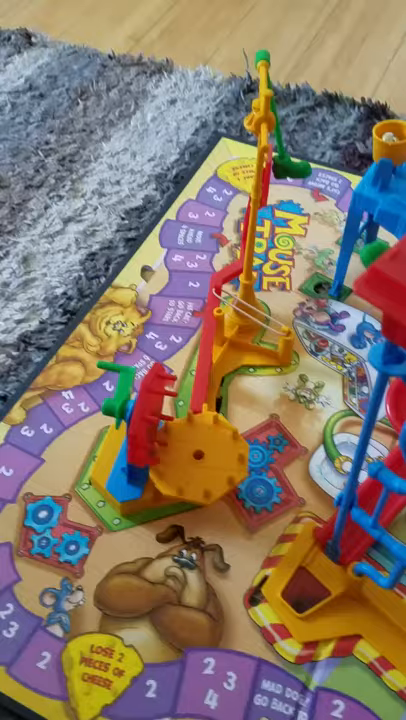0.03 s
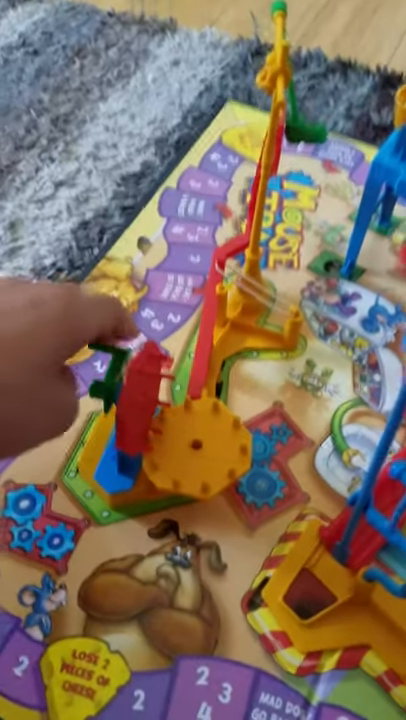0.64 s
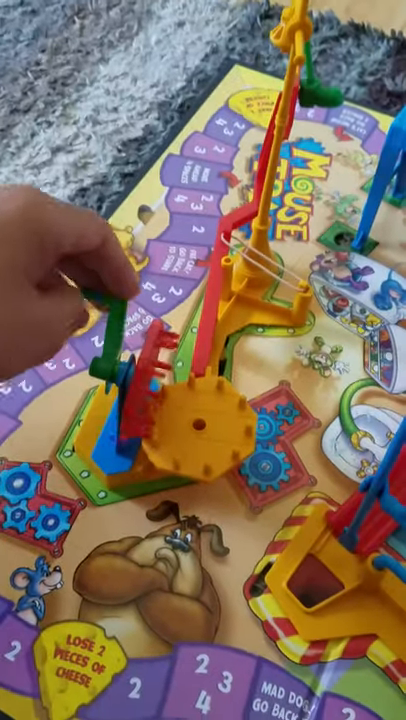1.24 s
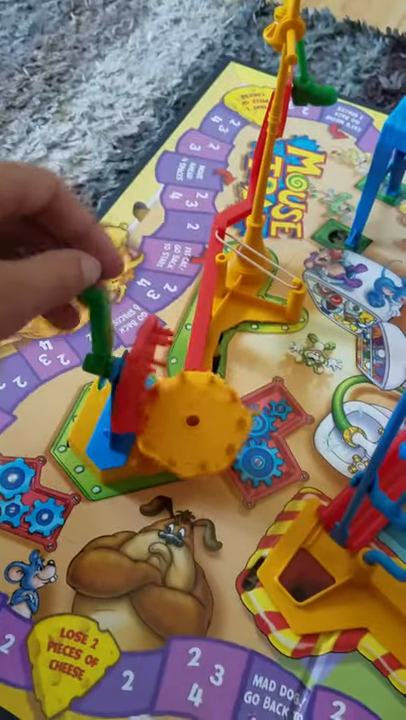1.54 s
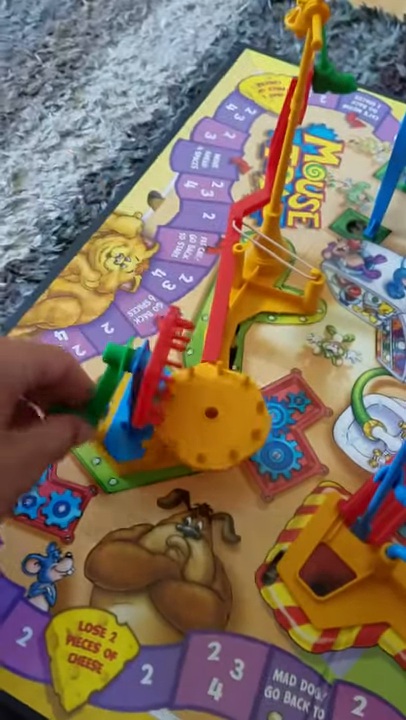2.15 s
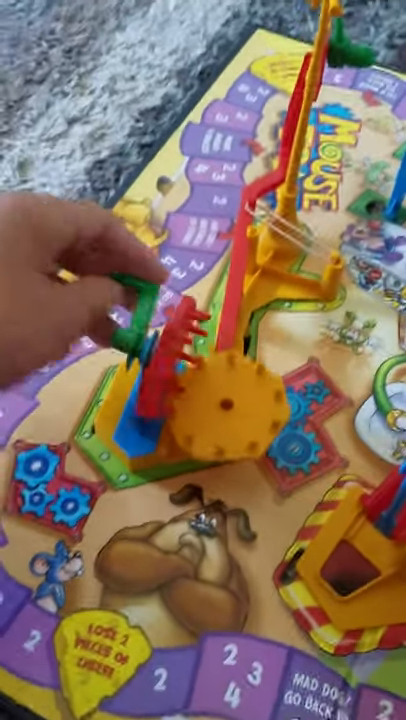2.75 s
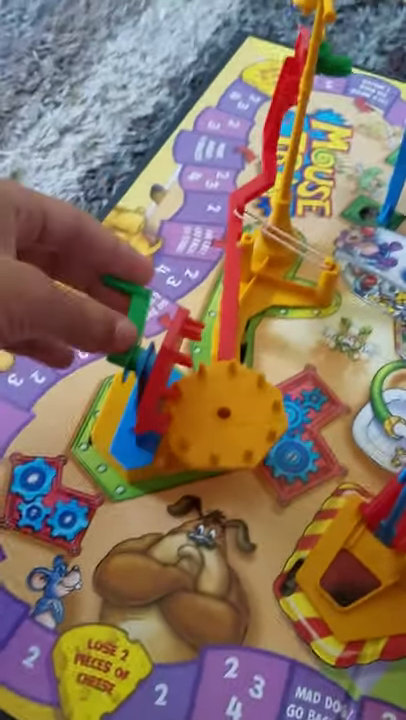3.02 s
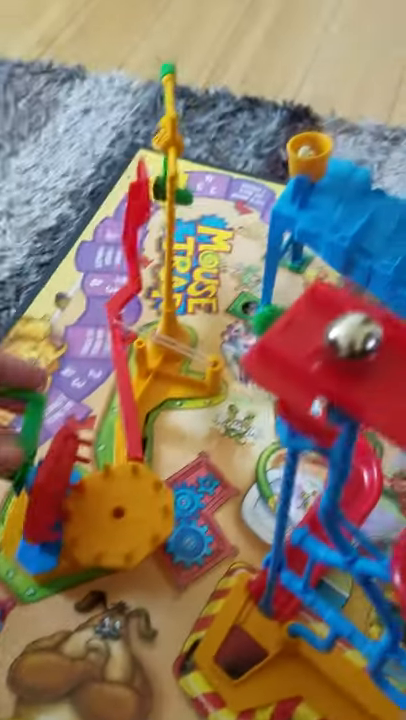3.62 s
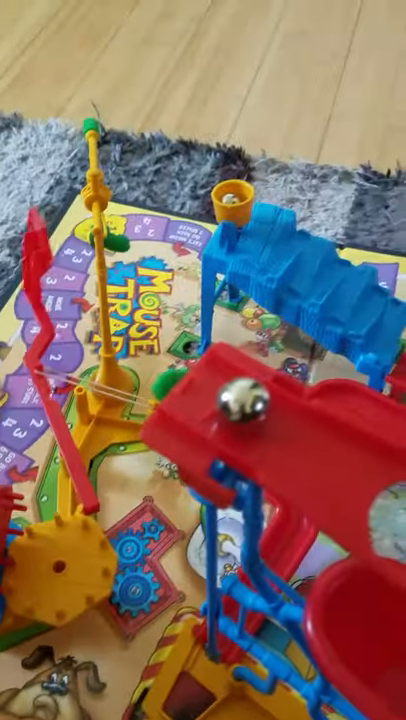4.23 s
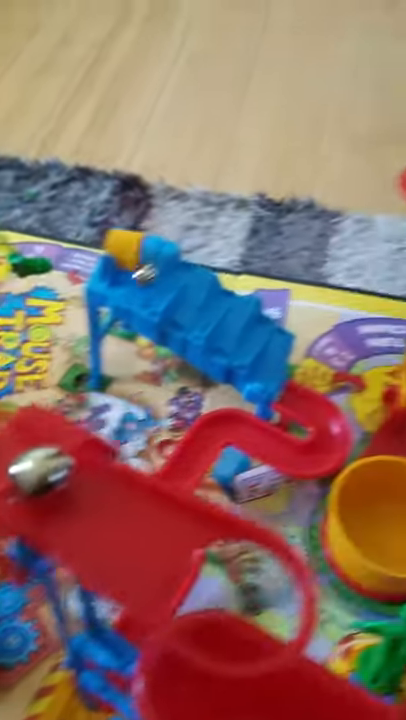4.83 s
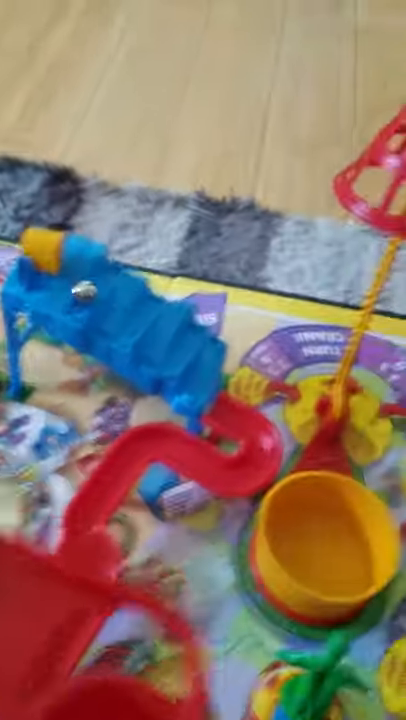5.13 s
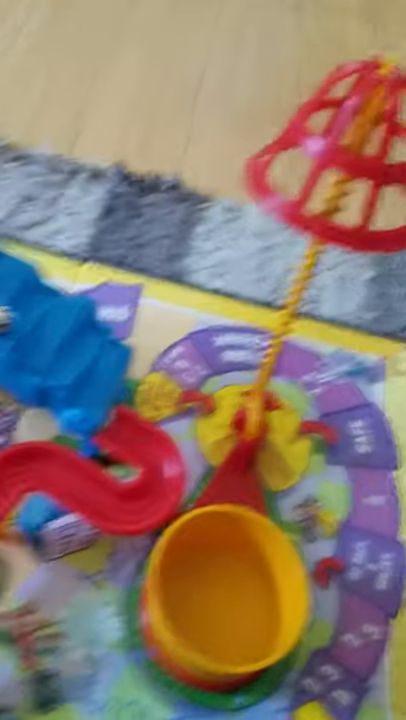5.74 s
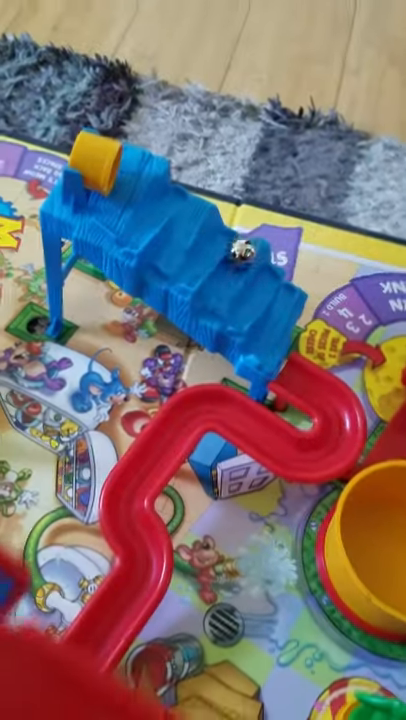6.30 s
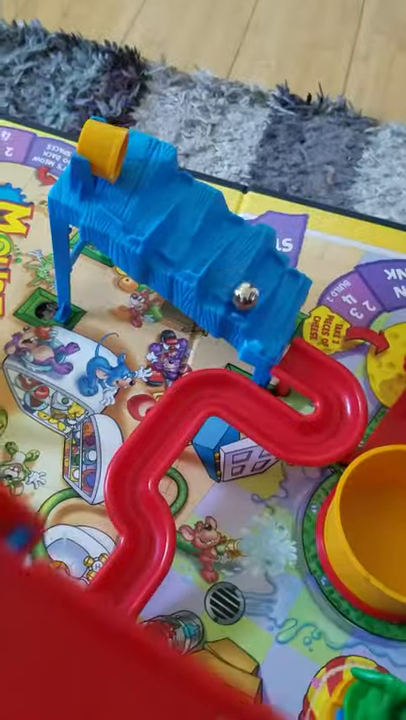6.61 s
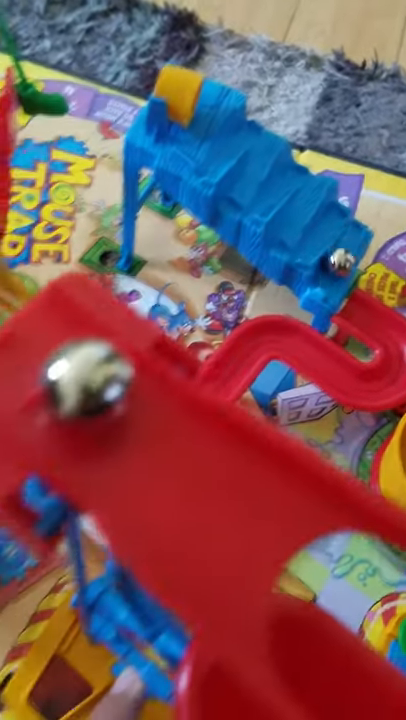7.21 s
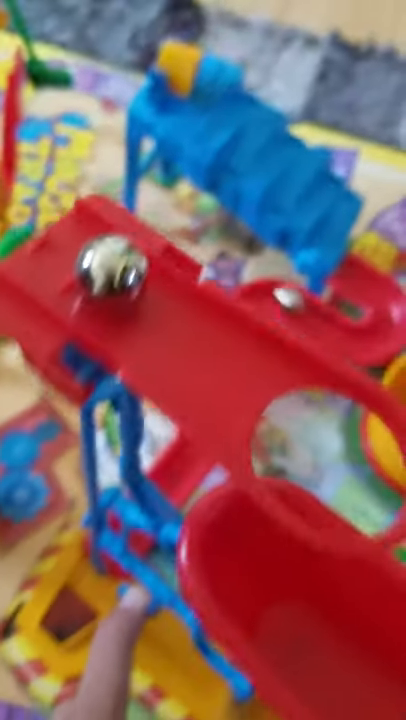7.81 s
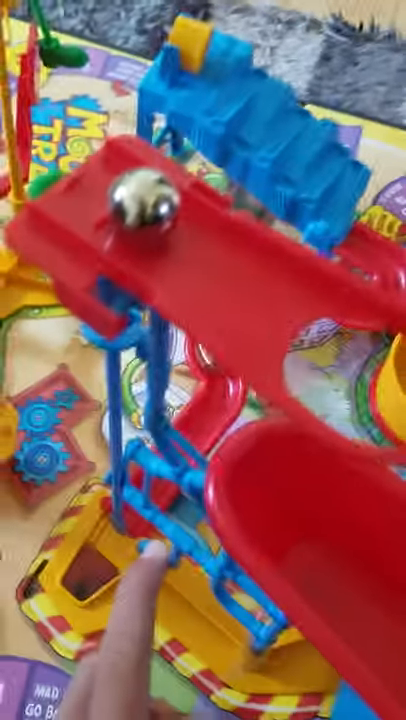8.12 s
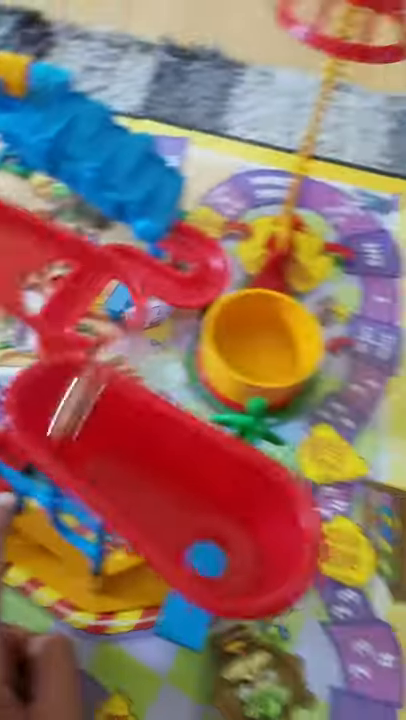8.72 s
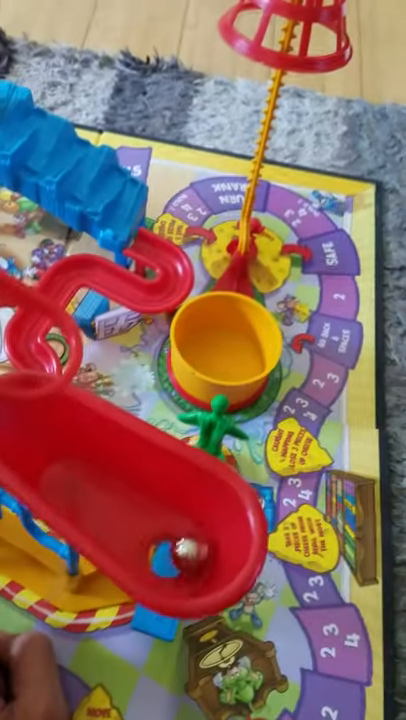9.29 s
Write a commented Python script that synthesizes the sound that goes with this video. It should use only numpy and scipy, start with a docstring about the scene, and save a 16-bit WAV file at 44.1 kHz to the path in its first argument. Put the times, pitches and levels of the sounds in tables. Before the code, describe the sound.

Small plastic gears click and grind softly as a toy crank turns, followed by a few faint ticks. A lever snaps with a sharp rattle, and a steel ball knocks unevenly down hollow plastic steps, then rumbles along a chute. A plank clatters and a second ball drops into a plastic tub with the loudest clacks, bouncing and settling. It is all heard close by in a quiet living room.

```python
"""Plastic gears grind and click over faint room air: a crank starts a chain-reaction toy on a game board. The
crank ticks at a steady pace and a stretched lever snaps; a steel ball tumbles down steps, rolls along a chute
and knocks a rod, which drops a second ball off a plank into a tub. Blows and tiny rolling bumps ring each
plastic part's resonances. Heard close by in a living room."""
import sys
import numpy as np
from scipy import signal
from scipy.fft import rfft, irfft
from scipy.io import wavfile
from scipy.ndimage import uniform_filter1d

SR = 44100
rng = np.random.default_rng(int(sys.argv[2]) if len(sys.argv) > 2 else 0)


def int16_out(signal):
    """Quantize to a 16-bit WAV file."""
    q = np.round(np.clip(np.atleast_2d(signal).T, -1, 1) * 32767)
    wavfile.write(sys.argv[1], SR, q.astype(np.int16))


N = 412335
TIME_S = np.arange(N) / SR

# Blows: (time [s], clack level [dB], tick re clack [dB], spot ring [Hz], first hop [s])
TUB_HITS = [(8.7985, -18.5, -11, 1480, 0.00014), (8.826, -15, -9.5, 1750, 0.016),
            (8.922, -26.5, -9.5, 1450, 0), (8.951, -19.5, -9, 1800, 0.021), (9.016, -20, -12, 1590, .019),
            (9.124, -43.5, -33, 1500, 0.014), (9.166, -43.5, -21.5, 1460, 0),
            (9.199, -48, -8, 1940, 0.0022), (9.317, -58, -12, 1480, 0)]
STEP_HITS = [(4.916, -32, -10, 1980, 0.029), (4.999, -29, -9.5, 1600, 0.048), (5.146, -45.5, -1, 1300, 0),
             (5.217, -39, -19, 1340, 0.025), (5.354, -49.5, -22, 1700, 0.00053),
             (5.389, -38.5, -19, 1270, 0.0014), (5.407, -30, -20, 1650, 0.026),
             (5.471, -27, -18.5, 1500, 0.026), (5.721, -25, -20, 1500, 0.045), (5.788, -24, -14, 2100, 0),
             (5.833, -29.5, -26, 1490, .017), (6.04, -41.5, -23, 1260, 0.02),
             (6.151, -27, -16.5, 1400, 0.022), (6.219, -27, -16.5, 2500, .043), (6.232, -32, -17, 2430, 0),
             (6.524, -27.5, -16.5, 1100, 0.037), (6.649, -29, -8.5, 1670, 0),
             (6.854, -38, -17.5, 2100, .031), (6.982, -33.5, -18.5, 2100, 0.012),
             (7.039, -33, -10, 2150, 0), (7.065, -34, -21, 2100, 0), (7.096, -34.5, -19, 2280, 0)]
LEVER_HITS = [(4.416, -37.5, -7, 2450, 0), (4.424, -33.5, -12, 2770, 0.0098),
              (4.446, -31, -9, 2520, 0.0018), (4.458, -30.5, 5, 8300, 0), (4.466, -31.5, -1, 2610, 0),
              (4.494, -34.5, -28, 2580, 0.00031), (4.514, -35, 10, 12800, 0.031),
              (4.606, -37, -12, 2430, 0), (4.639, -22, -8.5, 3600, 0.00048), (4.698, -29, -9, 3450, 0),
              (4.716, -30, -16, 1220, 0), (4.776, -35, -4, 3240, .013)]
PLANK_HITS = [(8.417, -37, 7, 2130, 0.001), (8.437, -31, -4.5, 2010, 0.011),
              (8.494, -28.5, 0, 1740, 0.0063), (8.525, -30, -5, 1860, 0.031),
              (8.576, -32.5, -13.5, 1020, 0), (8.64, -42, -14, 1000, 0.0043), (8.675, -48, -4, 1470, 0),
              (8.715, -47.5, 8.5, 2220, 0.044)]
CHUTE_HITS = [(7.296, -33.5, -9.5, 2050, .022), (7.382, -32, 1, 14000, 0), (7.404, -31, -1, 5160, 0),
              (7.51, -48, -9, 2770, 0.0022), (7.582, -40.5, -18, 2680, 0), (7.73, -47, -22, 2100, 0),
              (7.883, -44.5, -11, 1490, 0.0023), (8.194, -38.5, -11.5, 1700, 0.016)]
GEAR_HITS = [(0.639, -54.5, -1.5, 2620, 0), (1.303, -61, -6, 1000, 0.0006), (1.391, -56, -8, 1000, 0),
             (1.486, -56.5, -28, 1610, 0.0016), (1.67, -46, -19, 2200, 0.0013),
             (1.686, -41.5, -4.5, 2850, 0), (1.812, -53.5, -4, 1590, 0.00095),
             (1.956, -41.5, -3.5, 1520, 0), (2.157, -44, 0, 12530, .046), (2.393, -50.5, -8, 2200, 0.046),
             (2.724, -47, -3, 2200, 0), (2.762, -49, -0.5, 2040, 0.0039)]
CRANK_TICK_HITS = [(3.03, -51.5, -4.5, 1620, 0.00098), (3.175, -47.5, 2, 2580, 0.0039),
                   (3.273, -59, -22, 1560, 0.00047), (3.386, -53, -1.5, 2600, 0), (3.562, -63.5, -28, 1500, 0),
                   (3.664, -59.5, -28, 1340, 0.042), (3.849, -56.5, -28, 1770, .026),
                   (4.002, -62.5, -17, 1320, 0.0023), (4.155, -53.5, -17.5, 1370, 0),
                   (4.283, -62, -19, 1700, 0)]
# Broad colour of each part: (frequency [Hz], gain [dB])
TUB_COLOUR = [(60, -35), (200, -15), (330, -6.5), (550, 3.5), (900, -3), (1600, -8), (2600, -15),
              (4500, -15), (8000, -28.5), (12000, -18), (15500, -23)]
STEP_COLOUR = [(60, -38), (200, -26), (320, -16), (450, -4), (640, -2), (830, -20.5), (1600, -16),
               (2600, -22.5), (4500, -29), (8000, -32), (15500, -33.5)]
LEVER_COLOUR = [(60, -36), (200, -24), (330, -14.5), (550, -2), (900, -16), (1600, -17.5), (2600, -17.5),
                (4500, -19.5), (8000, -18), (12000, -18.5), (15500, -24)]
PLANK_COLOUR = [(60, -37), (200, -5), (330, 5), (550, 1.5), (900, -6), (1600, -10), (2600, -13),
                (4500, -20.5), (8000, -28), (12000, -27), (15500, -30)]
CHUTE_COLOUR = [(60, -45), (200, -22.5), (330, -8.5), (550, -3), (900, -7.5), (1600, -11), (2600, -13.5),
                (4500, -21.5), (8000, -33), (12000, -24), (15500, -23.5)]
GEAR_COLOUR = [(60, -20.5), (200, -13.5), (380, -5), (600, -1.5), (1100, -7), (2400, -4.5), (4500, -22),
               (8000, -25.5), (12000, -27.5), (15500, -30.5)]
CRANK_TICK_COLOUR = [(60, -35), (200, -17), (350, -4.5), (550, -10), (900, -10.5), (1600, 0.5), (2600, -5.5),
                     (4500, -15.5), (8000, -18), (15500, -26)]
# Resonances: (frequency [Hz], width [Hz], peak re colour [dB])
TUB_MODES = [(403, 76, 9.7), (1227, 27, 7.9), (1455, 50, 10), (1866, 170, 8.6), (2300, 230, 12.5),
             (2640, 17, 7.4), (2850, 15, 11), (4330, 37, 8.9), (5330, 200, 4.3), (5900, 61, 13),
             (6500, 247, 9.7), (7640, 700, 11.7), (10400, 73, 13), (10780, 160, 7.9)]
STEP_MODES = [(535, 39, 7), (935, 78, 10.2), (1057, 160, 6.3), (1236, 32, 7.8), (1410, 6.4, 1.6),
              (2086, 56, 3.1), (2429, 35, 13), (3010, 155, 9.1), (3680, 21, 6), (4020, 52, 7.9),
              (5750, 110, 2.6), (6200, 43, 7.2), (6670, 34, 2.3), (8200, 31, 5.7)]
LEVER_MODES = [(1242, 5.8, 15.3), (2380, 17, 5.7), (2537, 23, 14.4), (3760, 300, 4.6), (4140, 82, 6.8),
               (6150, 43, 8.5), (7350, 57, 6.9), (8150, 70, 8.1), (13000, 1200, 4)]
PLANK_MODES = [(720, 38, 1.4), (1467, 44, 14.7), (1885, 100, 11), (2230, 150, 10.4), (2610, 19, 6.9),
               (3585, 15, 13), (4190, 66, 12.4), (5530, 370, 4.8), (7130, 230, 5.9)]
CHUTE_MODES = [(437, 38, 7.4), (546, 50, 2.4), (660, 140, 2.5), (2070, 12, 3.1), (2325, 22, 7.7),
               (4070, 18, 2.2), (5260, 91, 6.8), (6960, 910, 9.8)]
GEAR_MODES = [(410, 150, 5), (699.7, 60, 10), (1520, 68, 6), (1610, 77, 6.5), (2260, 120, 4.5),
              (3960, 510, 6), (12500, 1300, 7)]
CRANK_TICK_MODES = [(680, 56, 15.6), (975, 91, 5), (2610, 35, 13.4), (4070, 64, 13), (6170, 80, 12),
                    (8230, 140, 12)]
# Rolling and rubbing, before band gains: (time [s], rumble [dB], rattle [dB])
TUB_ROLL = [(8.85, -25, -18), (8.9, -38, -63), (9.1, -60, -50), (9.18, -49, -48.5), (9.27, -69, -73),
            (9.35, -57, -60)]
PLANK_ROLL = [(8.41, -37, -40), (8.47, -31.5, -30.5), (8.61, -52, -55), (8.69, -52, -49.5),
              (8.81, -33.5, -28.5)]
CHUTE_ROLL = [(7.3, -44.5, -33), (7.55, -43.5, -48), (7.7, -36, -39), (7.83, -51.5, -57),
              (8.05, -48.5, -51), (8.15, -44, -35), (8.34, -37, -37.5), (8.43, -39, -42)]
GEAR_GRIND = [(1.25, -73, -70), (1.38, -58.5, -63), (1.72, -53.5, -47), (1.92, -50, -54), (2.06, -69, -74),
              (2.19, -51.5, -57.5), (2.35, -60, -63), (2.78, -53.5, -54.5), (2.88, -64, -82)]
# Runs along the treads, before band gains: (start [s], end [s], end level [dB])
STEP_RUNS = [(4.83, 5.0, -32.5), (5.22, 5.5, -38), (5.56, 5.85, -33.5), (5.98, 6.1, -35),
             (6.33, 6.52, -37.5), (6.91, 7.08, -42), (7.15, 7.29, -43)]
# Background noise spectra: (frequency [Hz], gain [dB])
AIR_COLOUR = [(15, -21), (25, -5), (49, -20.5), (107, -4.5), (174, -25), (241, -29), (291, -10.5),
              (449, -8.5), (557, -15.5), (749, -14), (1040, -19.5), (1360, -19), (8490, -37),
              (15800, -25.5)]
RUMBLE_COLOUR = [(25, -38), (55, -16), (75, -6), (92, -25), (107, 1.5), (135, -11.5), (170, -14.5),
                 (235, -10), (330, -35), (900, -74)]
# Rumble swells: (centre [s], half width [s], level [dB])
RUMBLE_SWELLS = [(.35, 0.28, -60.5), (2.3, 0.32, -64), (8.2, 0.55, -56)]
# Hum tones: (frequency [Hz], level [dB])
HUM_TONES = [(75.4, -79), (104, -71), (242.2, -73)]
# Room decay: (frequency [Hz], T60 [s])
ROOM_T60 = [(150, 0.58), (500, 0.16), (1500, 0.24), (4000, 0.26), (9000, 0.26), (15000, 0.22)]
# Stereo width: (frequency [Hz], side re mid [dB])
STEREO_WIDTH = [(100, -14.5), (500, -12), (1000, -4.5), (2000, 0), (4000, 0.5), (15000, 0.5)]


def tub():
    """The second ball falls into the tub, bounces and settles."""
    shell = body(TUB_COLOUR, TUB_MODES)
    knocks = blows(rebounds(TUB_HITS, loss_db=10.5, dulling_db=1), shell,
                   chatter_db=11.5, chatter_s=.003, linger_db=-14, side_db=-3, kick=.85,
                   ring_db=6, thud_db=-8, softening=.23, pan_db=1.5)
    rolling = roll(TUB_ROLL, shell, bumps_per_s=510, uneven_db=-1,
                   rumble_db=-3, rattle_db=-3, fizz_db=-21, pan_db=-2.5)
    return room(knocks + rolling, wet_db=-6)


def steps():
    """The ball zigzags down hollow steps, bouncing at every turn."""
    stairs = body(STEP_COLOUR, STEP_MODES)
    knocks = blows(rebounds(STEP_HITS, loss_db=6.5, dulling_db=2), stairs,
                   chatter_db=7.5, chatter_s=.003, linger_db=-14, side_db=-3.5, kick=.71,
                   ring_db=6.5, thud_db=-1.5, softening=.25, pan_db=1.4)
    rolling = roll(tread_runs(STEP_RUNS), stairs, bumps_per_s=650, uneven_db=4.5,
                   rumble_db=-4.5, rattle_db=-14, fizz_db=-39, pan_db=1)
    left, right = knocks + rolling
    return room(np.array([left, np.roll(right, 3)]), wet_db=-6)  # arrives from the left


def tread_runs(runs, growth_db=7.5, fade_db_per_s=161):
    """Roll curve: the ball gathers speed on each tread until the corner stops it."""
    t = np.arange(runs[0][0], runs[-1][1] + .1, .005)
    each_db = [db - np.interp(t, [start, end], [growth_db, 0])
               - fade_db_per_s * abs(t - np.clip(t, start, end)) for start, end, db in runs]
    level_db = np.max(each_db, axis=0)
    return np.transpose([t, level_db, level_db])


def lever():
    """The lever snaps free and kicks over the bucket holding the ball."""
    arm = body(LEVER_COLOUR, LEVER_MODES)
    knocks = blows(rebounds(LEVER_HITS, loss_db=3, dulling_db=9.5), arm,
                   chatter_db=3, chatter_s=.003, linger_db=-7, side_db=-2, kick=1,
                   ring_db=7, thud_db=-2, softening=.069, pan_db=1)
    return room(knocks, wet_db=-6)


def plank():
    """The rod jolts the plank; the second ball starts to roll."""
    board = body(PLANK_COLOUR, PLANK_MODES)
    knocks = blows(rebounds(PLANK_HITS, loss_db=5.5, dulling_db=18), board,
                   chatter_db=15.5, chatter_s=.0073, linger_db=-7, side_db=-2, kick=.21,
                   ring_db=5, thud_db=.3, softening=.02, pan_db=.5)
    rolling = roll(PLANK_ROLL, board, bumps_per_s=870, uneven_db=3.5,
                   rumble_db=-6.5, rattle_db=-3, fizz_db=-10, pan_db=1)
    return room(knocks + rolling, wet_db=-13.5)


def chute():
    """The ball drops into the winding chute and rumbles along it."""
    trough = body(CHUTE_COLOUR, CHUTE_MODES)
    knocks = blows(rebounds(CHUTE_HITS, loss_db=4.5, dulling_db=3), trough,
                   chatter_db=9, chatter_s=.0071, linger_db=-17, side_db=-.5, kick=.7,
                   ring_db=-1, thud_db=1.5, softening=-.11, pan_db=1.5)
    rolling = roll(CHUTE_ROLL, trough, bumps_per_s=1500, uneven_db=4,
                   rumble_db=-5, rattle_db=-11.5, fizz_db=-39, pan_db=1.1)
    return room(knocks + rolling, wet_db=-7.5)


def crank():
    """Gear teeth rub and click; then the crank's teeth tick at a steady pace."""
    gears = body(GEAR_COLOUR, GEAR_MODES)
    clicks = rebounds(GEAR_HITS, loss_db=3, dulling_db=13) + tooth_ticks(GEAR_GRIND)
    teeth = blows(clicks, gears, chatter_db=10, chatter_s=.0085, linger_db=-20.5, side_db=-5, kick=.31,
                  ring_db=7.5, thud_db=-1.5, softening=.12, pan_db=2.3)
    grind = roll(GEAR_GRIND, gears, bumps_per_s=60, uneven_db=8.5,
                 rumble_db=-1.5, rattle_db=-4, fizz_db=-15.5, pan_db=-.5)
    ticking_teeth = body(CRANK_TICK_COLOUR, CRANK_TICK_MODES)
    ticks = blows(rebounds(CRANK_TICK_HITS, loss_db=5.5, dulling_db=6), ticking_teeth,
                  chatter_db=10, chatter_s=.0052, linger_db=-16, side_db=0, kick=.41,
                  ring_db=10, thud_db=.5, softening=.1, pan_db=.2)
    return room(teeth + grind + ticks, wet_db=-6)


def tooth_ticks(curve, per_s=11, gain_db=-2.5, tick_db=-26, uneven_db=7, ring_hz=1900, spread_oct=.4):
    """Teeth catch at an uneven pace, as hard as the gears grind."""
    knots_s, _, rattle_db = np.transpose(curve)
    slots_s = np.arange(knots_s[0], knots_s[-1], 1 / per_s)
    late, hard, sharp, place = rng.uniform(-1, 1, (256, 4))[:len(slots_s)].T
    times_s = slots_s + .5 * late / per_s
    levels_db = np.interp(times_s, knots_s, rattle_db) + gain_db + uneven_db * hard
    rings_hz = ring_hz * 2 ** (spread_oct * place)
    return list(zip(times_s, levels_db, tick_db + uneven_db * sharp, rings_hz))


def rebounds(hits, loss_db, dulling_db, hop_ratio=.7, min_hop_s=.004):
    """A blow with a long enough hop rebounds twice, each time sooner, weaker and duller."""
    out = []
    for time_s, db, tick_db, ring_hz, hop_s in hits:
        for k in range(3 if hop_s > min_hop_s else 1):
            out.append((time_s, db - loss_db * k * (k + 1) / 2, tick_db - dulling_db * k, ring_hz))
            time_s += hop_s * hop_ratio ** k
    return out


def blows(hits, response, chatter_db, chatter_s, linger_db, side_db, kick, ring_db, thud_db, softening,
          pan_db, pan_scatter_db=.8, rms_window_s=.012, size=8192):
    """Each blow: sharp contact, a kick of the part against the board, dying chatter of loose joints."""
    out = np.zeros((2, N))
    t = np.arange(size) / SR
    decay = np.exp(-t / chatter_s) + amp(linger_db) * np.exp(-t / .021)
    hardest_db = max(db for _, db, _, _ in hits)
    for time_s, db, tick_db, ring_hz in hits:
        noise = rng.standard_normal((3, size))
        lean_db = pan_db + pan_scatter_db * rng.standard_normal()
        chatter, side_chatter = (unit(row * decay) * amp(chatter_db) for row in noise[:2])
        board_kick = signal.unit_impulse(size, int(SR * rng.uniform(.0024, .004)))
        contact = unit(signal.unit_impulse(size, 12) + kick * board_kick)
        side = side_chatter + unit(noise[2] * np.exp(-t / .0067))
        force = stereo(contact + chatter, amp(side_db) * side)
        sound = convolve(convolve(force, response), struck_spot(ring_hz, ring_db))
        soft_db = softening * (hardest_db - db)  # softening > 0: weak blows have more thud
        levels = amp([db + thud_db + soft_db, db, db + tick_db])
        pans_db = np.array([.37, 1, 1]) * lean_db  # long waves reach both sides more evenly
        for level, band_pan_db, band in zip(levels, pans_db, bands(sound)):
            onset_rms = np.std(band[:, :int(rms_window_s * SR)])
            add(out, time_s, panned(level * band / onset_rms, band_pan_db))
    return out


def roll(curve, response, bumps_per_s, uneven_db, rumble_db, rattle_db, fizz_db, pan_db):
    """Tiny bumps shake a part while something rolls or rubs on it."""
    out = np.zeros((2, N))
    knots_s, *curves_db = np.transpose(curve)
    t = np.arange(knots_s[0], knots_s[-1], 1 / SR)
    is_bump = rng.random(N)[:len(t)] < bumps_per_s / SR
    mid, side, surface = rng.standard_normal((3, N))[:, :len(t)]
    roughness = amp(uneven_db * np.tanh(unit(uniform_filter1d(surface, size=600))))
    bumps = roughness * (is_bump + .045)
    shaken = convolve(stereo(np.sign(mid) * bumps, np.sign(side) * bumps), response)
    low_db, high_db = (np.interp(t, knots_s, db) for db in curves_db)
    levels = amp([low_db + rumble_db, high_db + rattle_db, high_db + fizz_db])
    sound = sum(level * unit(band) for level, band in zip(levels, bands(shaken)))
    add(out, knots_s[0], panned(sound, pan_db) * signal.windows.tukey(len(t), .03))
    return out


def body(colour, modes, size=16384):
    """Impulse response of a plastic part: resonances over a broad colour."""
    hz = np.fft.rfftfreq(size, 1 / SR)
    peaks = sum(resonance(hz, *mode) for mode in modes)
    return causal(np.log(amp(lookup(colour, hz))) + np.log1p(peaks) / 2)


def struck_spot(ring_hz, ring_db, patch_db=1.2, patch_hz=350, size=2048):
    """The wall at the struck spot adds a short ring and its own uneven colour."""
    hz = np.fft.rfftfreq(size, 1 / SR)
    patches = np.interp(hz / patch_hz, np.arange(size), rng.standard_normal(size))
    ring = np.log1p(resonance(hz, ring_hz, .08 * ring_hz, ring_db)) / 2
    return causal(ring + np.log(amp(patch_db * patches)))


def resonance(hz, centre_hz, width_hz, peak_db):
    """Power spectrum of one damped mode."""
    return amp(peak_db) ** 2 / (1 + (2 * (hz - centre_hz) / width_hz) ** 2)


def causal(log_gain):
    """Minimum-phase response: rings only after the blow."""
    mirrored = np.concatenate([log_gain, log_gain[-2:0:-1]])
    return np.fft.ifft(np.exp(np.conj(signal.hilbert(mirrored)))).real[:len(log_gain)]


def crossover(x, hz):
    """Low and high halves, fourth order."""
    sections = (signal.butter(2, hz, kind, fs=SR, output="sos") for kind in ("low", "high"))
    return [signal.sosfilt(np.tile(sos, (2, 1)), x) for sos in sections]


def bands(x):
    thud, rest = crossover(x, hz=900)
    clack, tick = crossover(rest, hz=4000)
    return thud, clack, tick


def amp(db):
    return 10 ** (np.asarray(db) / 20)


def unit(x):
    return x / np.sqrt(np.mean(x ** 2) + 1e-24)


def lookup(table, hz):
    knots_hz, values = np.transpose(table)
    return np.interp(np.log(hz + 1), np.log(knots_hz + 1), values)


def add(mix, start_s, sound):
    part = mix[:, round(start_s * SR):][:, :sound.shape[1]]
    part += sound[:, :part.shape[1]]


def convolve(x, response):
    return signal.fftconvolve(np.atleast_2d(x), np.atleast_2d(response), axes=1)[:, :x.shape[-1]]


def panned(x, pan_db):
    return x * amp([[pan_db / 2], [-pan_db / 2]])


def tint(x, colour):
    hz = np.fft.rfftfreq(x.shape[-1], 1 / SR)
    return irfft(rfft(x) * amp(lookup(colour, hz)), x.shape[-1])


def stereo(mid, side):
    """Left and right: narrow in the bass, wide in the treble."""
    side = tint(side, STEREO_WIDTH)
    return np.array([mid + side, mid - side])


def room(x, wet_db, echoes_per_s=4000, predelay_s=.005):
    """Add sparse wall reflections, each band dying at its own rate."""
    taps = rng.standard_normal((2, SR)) * (rng.random((2, SR)) < echoes_per_s / SR)
    hz, t, spectra = signal.stft(stereo(*taps), SR, nperseg=256)
    width_gain = np.sqrt(1 + amp(lookup(STEREO_WIDTH, hz)) ** 2)[:, None]
    decay = amp(-60 * t / lookup(ROOM_T60, hz)[:, None])
    tail = signal.istft(spectra / width_gain * decay, SR, nperseg=256)[1][:, :SR]
    tail *= np.clip((TIME_S[:SR] - predelay_s) / .00067, 0, 1)
    return x + amp(wet_db) * convolve(x, tail / np.linalg.norm(tail[0]))


def background(air_db=-65, rumble_rest_db=-72):
    """Faint air, a steady hum and a low rumble that swells and fades."""
    air, rumble = (unit(tint(stereo(*rng.standard_normal((2, N))), colour))
                   for colour in (AIR_COLOUR, RUMBLE_COLOUR))
    hum = sum(amp(db) * np.sqrt(2) * np.sin(2 * np.pi * (hz * TIME_S + rng.random()))
              for hz, db in HUM_TONES)
    swells = sum(amp(db) * np.exp(-((TIME_S - centre_s) / width_s) ** 2)
                 for centre_s, width_s, db in RUMBLE_SWELLS)
    low = hum + rumble * (amp(rumble_rest_db) + swells)
    fade_in = np.clip((TIME_S - .05) / .074, 0, 1)
    return (amp(air_db) * air + panned(low, pan_db=-4)) * fade_in


def scene():
    return crank() + lever() + steps() + chute() + plank() + tub() + background()


def record(dry, cutoff_hz=15950):
    """Clip at full scale, then low-pass."""
    lowpass = signal.firwin(511, cutoff_hz, window=("kaiser", 9), fs=SR)
    return signal.oaconvolve(np.clip(dry, -1, 1), lowpass[None], "same")


dry = scene()
out = record(dry)
int16_out(out)
```